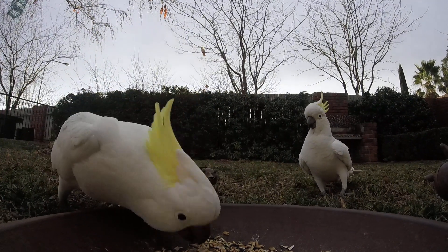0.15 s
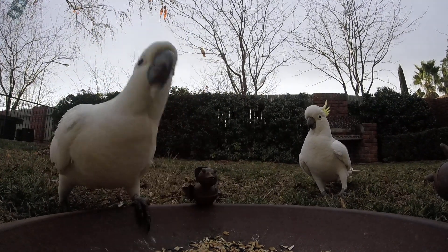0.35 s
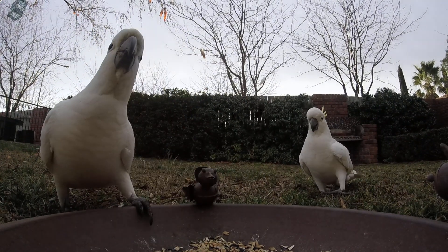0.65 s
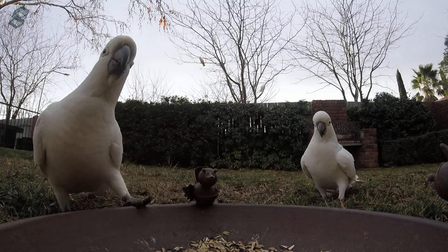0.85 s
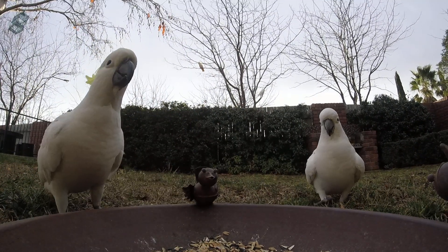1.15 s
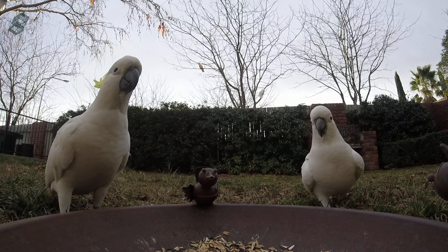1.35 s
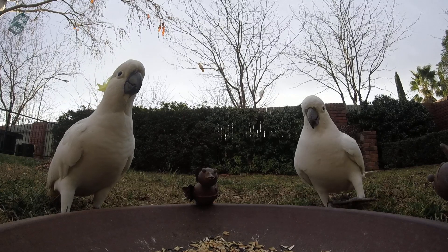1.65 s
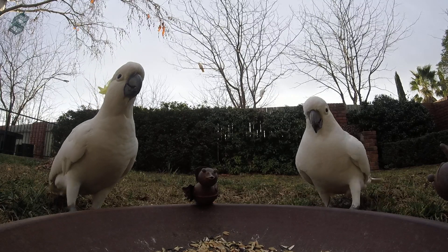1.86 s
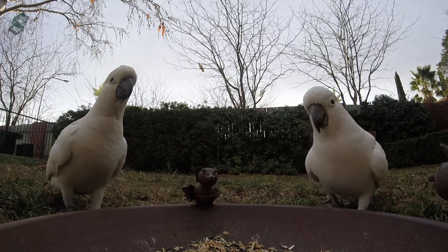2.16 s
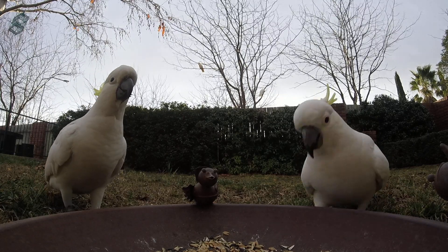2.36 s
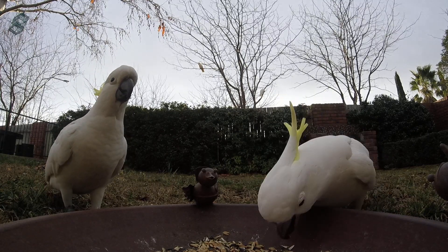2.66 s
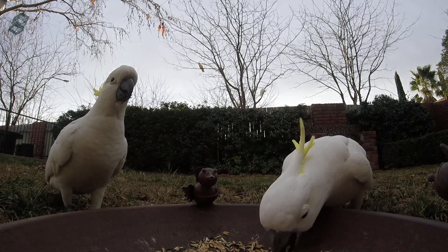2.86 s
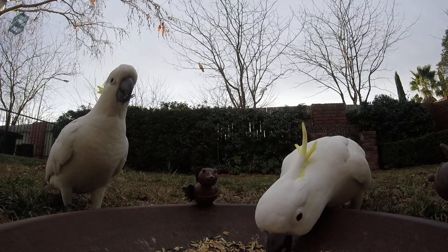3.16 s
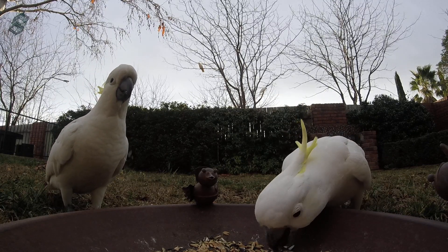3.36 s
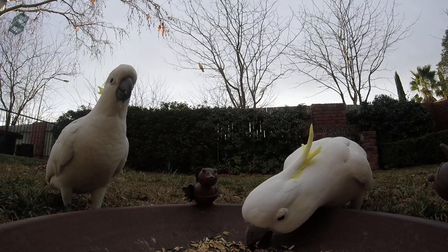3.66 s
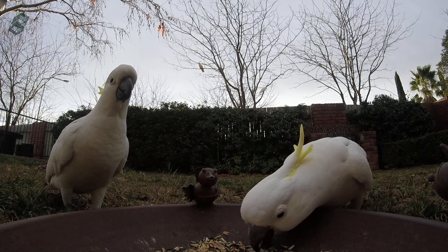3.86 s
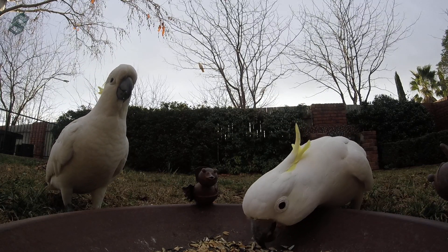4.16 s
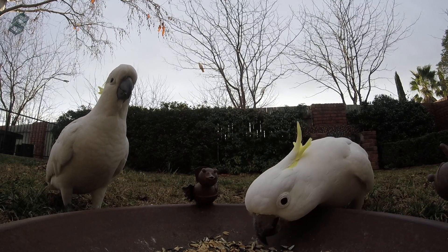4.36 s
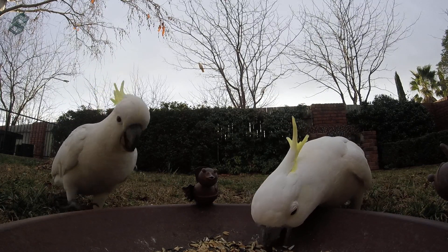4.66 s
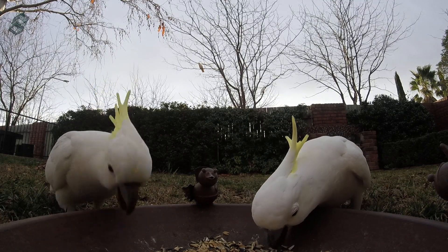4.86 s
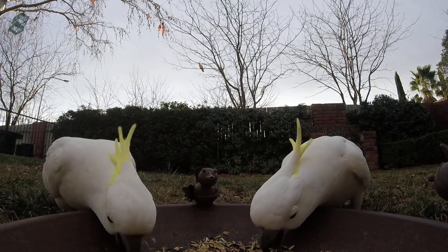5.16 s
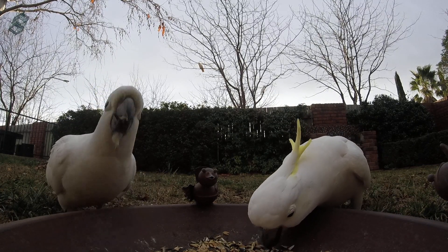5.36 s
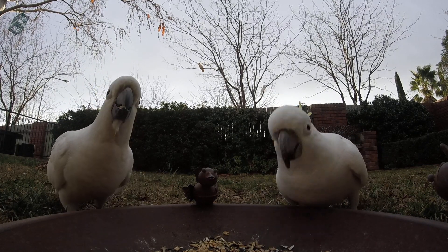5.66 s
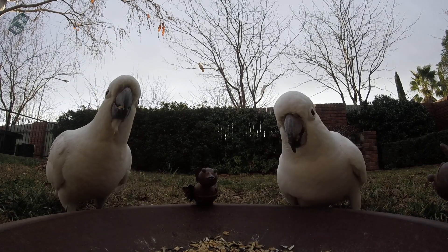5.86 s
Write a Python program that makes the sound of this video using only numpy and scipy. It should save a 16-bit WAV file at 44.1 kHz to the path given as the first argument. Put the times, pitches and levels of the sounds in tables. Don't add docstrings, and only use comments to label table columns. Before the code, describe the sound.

Large parrots' beaks knock a shallow outdoor bowl, with one very loud early peck, claw scrapes and taps, then sparse soft bumps and a late sharp peck.

```python
import sys
import numpy as np
from scipy import signal
from scipy.fft import rfft, irfft, next_fast_len
from scipy.io import wavfile

SR = 44100
rng = np.random.default_rng(int(sys.argv[2]) if len(sys.argv) > 2 else 0)


def volts_from_decibels(level):
    exponent = np.asarray(level, float) / 20
    return 10 ** exponent


def log_audio(samples):
    frames = np.atleast_2d(samples).T
    limited = np.clip(frames, -1, 1)
    pcm = np.round(limited * 32767).astype(np.int16)
    wavfile.write(sys.argv[1], SR, pcm)


N = 265305

# frequency in Hz, density in dB per Hz.
HISS_COLOUR = [(15, -11), (22, 0.5), (42, 0.5), (62, -6), (90, 0), (130, -1.5), (200, -5.5), (550, -11.5),
               (1500, -17.5), (2400, -20.5), (5000, -26.5), (9000, -34.5), (13000, -41.5), (15300, -50)]
# start in seconds, strength in dB, hardness in dB (upper ring
# over rim), weight in dB (wall over rim).
RIM_TAPS = [(.0084, -19, -12.5, -23), (.0143, -22, -17.5, -16), (.0812, -26, 6.5, -18),
            (.156, -37.5, -7, -3), (.4905, -48.5, -7, -9.5), (.5117, -33, -7, -12.5),
            (.662, -50.5, -7, -9.5), (.6972, -34, -6, -16), (.7465, -28, -26, -26),
            (.7913, -28.5, -17, -21), (.837, -27.5, -17, -23), (.8808, -32.5, -18.5, -13.5),
            (.9174, -21.5, -22.5, -21), (.9957, -36, -14, -9), (1.0226, -26.5, -10.5, -14),
            (1.0433, -25.5, -16.5, -22.5), (1.061, -26, -10, -24.5), (1.0868, -14.5, 6.5, -21.5),
            (1.1039, -21, -3, -20), (1.1198, -21.5, 1, -30.5), (3.5251, -32, -6, -17.5),
            (4.9027, -21, -10, -41.5), (5.2214, -29.5, -25, -20)]
# start in seconds, strength in dB, hardness in dB, weight in dB.
SEED_PECKS = [(.0573, -26.5, 5, -27), (.2142, -1.5, -13, -27), (.2214, -14.5, -13.5, -17),
              (.2428, -26, -7, -20), (.2592, -22.5, -4.5, -12.5), (3.0011, -34.5, -9, -5),
              (3.0144, -43.5, -11, -5), (3.0709, -47, -4.5, -15.5), (3.242, -50, -19, -8),
              (3.2914, -32.5, -22, -5.5), (3.3094, -43, -9, 3), (3.8726, -54, -15, -15.5),
              (3.9165, -52.5, -11, -8), (3.9564, -49, -8, -12), (4.1345, -31.5, -16, -13.5),
              (4.1494, -49, -23, -7), (4.2198, -50.5, -9.5, -11), (4.8788, -53, -14, -17.5),
              (5.2026, -14.5, -2.5, -15.5), (5.2494, -39, 12.5, 3), (5.4176, -41, -15.5, 3),
              (5.6644, -62.5, 6, -4.5)]
# start in seconds, crack in dB.
HUSK_SPLITS = [
    (0.0576, -29),
    (0.065, -41.5),
    (0.916, -62),
    (1.0868, -34),
    (4.9013, -51.5),
]
# start in seconds, tipping in dB, flexing in dB, drumming in dB,
# spot from 0 (over the lower hum) to 1 (over the upper hum).
PUSHES = [(.009, -33.5, -25, -19.5, 1), (.207, -13.5, -25.5, -12, 0.15), (.75, -48.5, -58, -40.5, 0.98),
          (0.899, -42, -57.5, -42.5, .3), (1.013, -35, -39, -38, 1), (1.086, -55, -39, -31, .9),
          (3.004, -25.5, -40, -43.5, .04), (3.09, -43, -42, -48.5, 0.36), (3.288, -35.5, -38.5, -40, 0.68),
          (3.376, -56, -54, -65, 0.16), (3.521, -50.5, -56.5, -57, .39), (3.916, -33, -54.5, -38.5, .36),
          (4.033, -47.5, -72, -56, .25), (4.135, -34.5, -44.5, -37, 0.39), (4.929, -33.5, -47, -53.5, 0.39),
          (5.203, -30.5, -29.5, -27.5, 0.63), (5.27, -37, -68, -26, 0.55), (5.415, -33.5, -55, -36.5, .69)]
# start in seconds, pressure in dB, hardness in dB.
CLAW_DRAG = [
    (.64, -63, 3),
    (.706, -46.5, 2),
    (.76, -36, -12),
    (.774, -52.5, -4),
    (.878, -35, -17),
    (.928, -35, -8.5),
    (.986, -41, -11),
    (1.067, -24, -12),
    (1.083, -30, -1.5),
]
# start in seconds, level in dB, hardness in dB, t60 in seconds.
RATTLES = [
    (.018, -28, -15.5, .07),
    (.058, -41.5, 7, 0.36),
    (0.101, -45, 2.5, 0.66),
    (.228, -33.5, -10.5, 0.16),
    (.487, -40.5, -18.5, .13),
    (1.086, -21, -10.5, 0.19),
    (5.212, -28.5, -13.5, 0.13),
    (5.252, -46, -1, 0.31),
]
# start in seconds, peak in dB.
FAINT_TICKS = [
    (2.1172, -47.5),
    (2.152, -50),
    (4.118, -50.5),
    (4.141, -52),
    (5.9138, -47.5),
    (5.9449, -47.5),
]
# time in seconds, centre in Hz, level in dB.
FAR_SCREECH = [
    (2.66, 2660, -83),
    (2.696, 2605, -65.5),
    (2.77, 2490, -60.5),
    (2.892, 2860, -60),
    (2.956, 2700, -64),
    (2.982, 2730, -74),
    (2.99, 2630, -59),
]

# frequency in Hz, level in dB, t60 in seconds.
ROCKING_MODES = [(32.25, -10.5, .18), (39.2, 0, 0.39), (33.36, -11.5, 1.41)]
FLEX_MODES = [(84.4, -2, 1.486), (98, -4, 0.61), (231, -13.5, 0.42), (304, -16.5, .8)]
LOWER_HUM_MODES = [(125.2, 5, 0.858), (121.2, -16, 3)]
UPPER_HUM_MODES = [(144.32, 2.5, 2.14), (197.9, -10, 1.01), (226.7, -24, 1.2)]
# frequency in Hz, level in dB, t60 in seconds.
STIFF_HUM_MODES = [(152.2, 0, 0.63), (193.5, -23, 0.2), (177.46, -23.5, 0.17), (212.5, -20, 0.04)]
# frequency in Hz, level in dB, t60 in seconds.
WALL_MODES = [(231.6, -5.5, 0.59), (304, -15.5, 1), (333, -7, 0.526), (373.4, -10, 1), (392, -5.5, 0.67),
              (453.4, -16.5, .2), (512, -2.5, 0.46), (580, -0.5, .08), (602.7, -0.5, .2), (658, -13, 0.14),
              (762.3, -16.5, 0.2), (897, 0.5, 0.14), (1000, -5, 0.1202)]
RIM_MODES = [(1210, -19.5, 0.067), (1269, -4, 0.2), (1250, -26.5, 0.19), (1372, 0, 0.12), (1386, -11, 0.36),
             (1431, 2, 0.11), (1420, 5, 0.019), (1492, 3.5, 0.13), (1591, -13, 0.47), (1630, -20.5, 0.15),
             (1752, -7, 0.13), (1780, -8.5, 0.13), (1880, -13, 0.3)]
UPPER_MODES = [(1980, -14.5, .15), (2145, -6, 0.16), (2250, 2, 0.12), (2491, -9, .18), (2511, -1, 0.11),
               (2730, -6.5, 0.18), (2592, 3, 0.1), (2680, 4.5, 0.056), (2936, 0, 0.1), (2990, 5.5, 0.06),
               (3040, -8.5, 0.05), (3097, -7.5, 0.13), (3208, -19.5, 0.28), (3235, -12, 0.1475),
               (3110, -7.5, 0.24), (3260, -2, 0.3)]
CASE_MODES = [(3640, -8.5, 0.025), (4016, -3.5, 0.032), (4700, -11.5, 0.016), (5062, -13, .08),
              (5958, -2.5, 0.027), (6100, -8.5, 0.057), (6290, -5, 0.054), (6800, -14.5, 0.017),
              (7490, -10.5, 0.018), (7820, -13.5, 0.012), (9680, -7, 0.021), (10494, -8, .025),
              (10750, -15, 0.017), (12000, -14.5, .015), (13440, -20.5, .01)]


def pole(t60_s):
    return volts_from_decibels(-60 / (t60_s * SR))


def impulses(start_s, gain):
    clicks = np.zeros(N)
    clicks[(start_s * SR).astype(int)] = gain
    return clicks


def band(x, low_hz, high_hz):
    return signal.sosfilt(signal.butter(2, [low_hz, high_hz], "band", fs=SR, output="sos"), x)


def ring(force, hz, t60_s):
    r, w = pole(t60_s), 2 * np.pi * hz / SR
    return signal.lfilter([0, np.sin(w)], [1, -2 * r * np.cos(w), r * r], force + 1e-18)


def puff(rows, column, t60_s):
    starts = impulses(rows[:, 0], volts_from_decibels(rows[:, column]))
    return signal.lfilter([1], [1, -pole(t60_s)], starts + 1e-18) * rng.standard_normal(N)


def strike(modes, rows, column, trim_db, spread_db, spot=None, chatter_s=0.023):
    rows = np.array(rows)
    share = rng.normal(0, 1, (len(rows), len(modes)))
    grit = rng.standard_normal(N)
    fade = pole(chatter_s)
    out, away_db = 0, 0
    for k, (hz, level_db, t60_s) in enumerate(modes):
        if spot:
            at_rim_hz, at_floor_hz, slope_db = spot
            place = np.clip(rows[:, -1], 0, 1)
            favoured_hz = np.interp(place, [0, 1], [at_rim_hz, at_floor_hz])
            away_db = -(25 + slope_db * place) * abs(np.log(hz / favoured_hz))
        gain = volts_from_decibels(rows[:, column] + level_db + trim_db + spread_db * share[:, k] + away_db)
        force = impulses(rows[:, 0], gain)
        burst = signal.lfilter([np.sqrt(1 - fade ** 2)], [1, -fade], force + 1e-18) * grit
        out = out + ring(burst, hz, t60_s)
    return out


def rub(modes, gain, per_s, grain_db):
    slips = rng.random(N) < per_s / SR
    slips = slips * volts_from_decibels(grain_db * np.minimum(rng.exponential(1, N), 4))
    slips = slips * rng.choice([-1, 1], N)
    steady = shaped = 0
    for hz, level_db, t60_s in modes:
        force = slips * rng.normal(0, 1, N) * volts_from_decibels(level_db)
        steady = steady + ring(force, hz, t60_s)
        shaped = shaped + ring(force * gain, hz, t60_s)
    return shaped / np.sqrt(np.mean(steady ** 2))


def amp_rms(x, db):
    return volts_from_decibels(db) * x / np.sqrt(np.mean(x ** 2) + 1e-24)


def curve(rows, column):
    rows = np.array(rows)
    return volts_from_decibels(np.interp(np.arange(N) / SR, rows[:, 0], rows[:, column], -150, -150))


def hiss():
    size = next_fast_len(N)
    hz = np.maximum(np.arange(size // 2 + 1) * SR / size, 1)
    colour_hz, colour_db = np.transpose(HISS_COLOUR)
    colour = volts_from_decibels(np.interp(np.log(hz), np.log(colour_hz), colour_db))
    return amp_rms(irfft(rfft(rng.standard_normal(size)) * colour, size)[:N], -54.5)


def contacts(rows, place, crack_db):
    s, rim_db, hard_db, weight_db = np.transpose(rows)
    upper_db = rim_db + hard_db
    return np.transpose([s, rim_db, upper_db, crack_db + 0.82 * upper_db, rim_db + weight_db, place + 0 * s])


def taps():
    rows = np.vstack([contacts(RIM_TAPS, place=0.17, crack_db=-33.5),
                      contacts(SEED_PECKS, place=0.92, crack_db=-28.5)])
    # favoured Hz at the rim, favoured Hz at the floor, extra dB lost per log step away at the floor
    rim = strike(RIM_MODES, rows, column=1, trim_db=-10, spread_db=2.5, spot=(1200, 1465, 84))
    upper = strike(UPPER_MODES, rows, column=2, trim_db=-9, spread_db=4.5, spot=(2500, 3004, 220))
    wall = strike(WALL_MODES, rows, column=4, trim_db=-11, spread_db=6, chatter_s=0.011)
    rings = band(rim, 1244, 1800) + band(upper, 1850, 3496) + band(wall, 219.3, 1150)

    thud = volts_from_decibels(3) * band(puff(rows, column=4, t60_s=0.17), 490, 1000)
    body = volts_from_decibels(-4.5) * band(puff(rows, column=1, t60_s=0.11), 1150, 1800)
    body = body + volts_from_decibels(-7.5) * band(puff(rows, column=2, t60_s=0.14), 2050, 3400)

    grit = puff(rows, column=3, t60_s=0.035) + puff(np.array(HUSK_SPLITS), column=1, t60_s=0.042)
    case = volts_from_decibels(-14.5) * sum(volts_from_decibels(level_db) * ring(grit, hz, t60_s) for hz, level_db, t60_s in CASE_MODES)
    crack = band(case, 3321, 11500) + volts_from_decibels(-4.5) * band(grit, 1802, 11000)
    return rings + thud + body + crack


def thumps():
    s, tip_db, flex_db, drum_db, spot = np.transpose(PUSHES)
    angle = np.clip(spot, 0, 1) * np.pi / 2
    size = int(0.00363 * SR)
    contact = np.hanning(size) * 2 / size

    def push(share):
        return np.convolve(impulses(s, share), contact)[:N]

    stiff = volts_from_decibels(9.5 + 1.3 * drum_db) * np.abs(np.cos(angle)) ** 0.45
    tipping = -ring(push(volts_from_decibels(tip_db)), 41, 0.11) * 150 / SR
    driven = [(tipping, ROCKING_MODES),
              (push(volts_from_decibels(flex_db)), FLEX_MODES),
              (push(-volts_from_decibels(drum_db) * np.cos(angle)), LOWER_HUM_MODES),
              (push(volts_from_decibels(drum_db) * np.sin(angle)), UPPER_HUM_MODES),
              (push(stiff), STIFF_HUM_MODES)]
    out = 0
    for force, modes in driven:
        out = out + sum(volts_from_decibels(level_db) * ring(force, hz, t60_s) for hz, level_db, t60_s in modes)
    return out


def strokes():
    t = np.arange(N) / SR
    drag = [(s, db, db + hard_db) for s, db, hard_db in CLAW_DRAG]
    rim, upper = curve(drag, column=1), curve(drag, column=2)
    held_s = 0.0088
    for s, db, hard_db, t60_s in RATTLES:
        dying = (t >= s) * volts_from_decibels(db - 60 * np.maximum(t - s - held_s, 0) / t60_s)
        rim, upper = rim + dying, upper + volts_from_decibels(hard_db) * dying
    return rim, upper


def scrapes():
    low, high = strokes()
    bright = volts_from_decibels(1) * high ** 1.494
    rim = volts_from_decibels(-1) * rub(RIM_MODES, low, per_s=720, grain_db=3.5)
    upper = volts_from_decibels(-3) * rub(UPPER_MODES, high, per_s=900, grain_db=4.5)
    case = volts_from_decibels(2.5) * rub(CASE_MODES, bright, per_s=1800, grain_db=5.5)
    seed = volts_from_decibels(2) * bright * rng.standard_normal(N)
    wall = volts_from_decibels(-20.5) * rub(WALL_MODES, low, per_s=370, grain_db=3.5)
    bowl = band(wall, 330, 1061) + band(rim, 996, 2700) + band(upper, 2100, 3450)
    return bowl + band(case, 4700, 12000) + band(seed, 3000, 9500)


def ticks():
    modes = [(5795, -1.5, 0.009), (6116, -2, 0.0091), (7340, -4, 0.0047), (9460, -1.5, 0.0028)]   # Hz, dB, t60 s
    clicks = strike(modes, FAINT_TICKS, column=1, trim_db=0.5, spread_db=2.5, chatter_s=0.0052)
    return band(clicks, 5400, 9300)


def screech():
    s, hz, _ = np.transpose(FAR_SCREECH)
    phase = 2 * np.pi * np.cumsum(np.interp(np.arange(N) / SR, s, hz)) / SR
    low_pass = signal.butter(2, 550, fs=SR, output="sos")
    a, b = signal.sosfilt(low_pass, rng.standard_normal((2, N)))
    call = a * np.cos(phase) + b * np.sin(phase)
    return amp_rms(call, 0) * curve(FAR_SCREECH, column=2)


def scene():
    return (taps() + thumps() + scrapes() + ticks() + screech() + hiss())[None]


def top_cut(x):
    return signal.sosfilt(signal.butter(12, 15670, fs=SR, output="sos"), x)


def record(dry):
    start_s, fade_s = 0.0015, 0.00052
    opened = dry * np.clip((np.arange(N) / SR - start_s) / fade_s, 0, 1)
    rounded = 1.437 * np.tanh(opened / 1.579)
    mix = signal.sosfilt(signal.cheby2(10, 60, 16300, fs=SR, output="sos"), rounded)
    return top_cut(mix)


dry = scene()
out = record(dry)
log_audio(out)
```